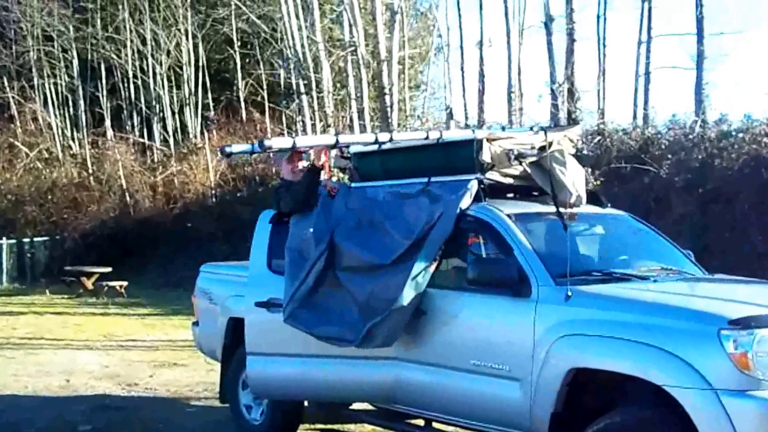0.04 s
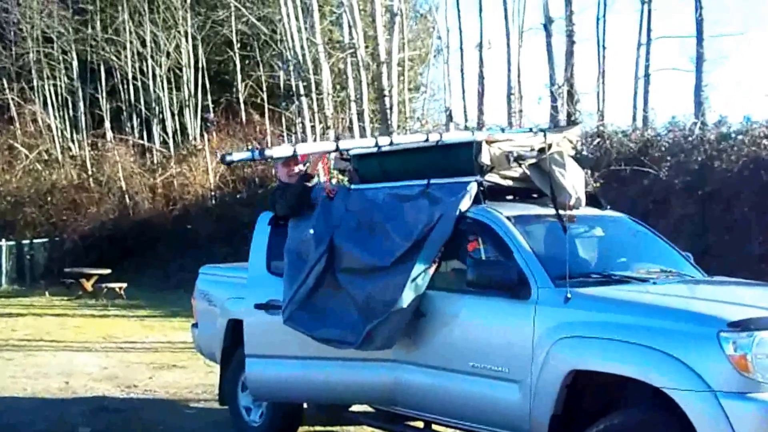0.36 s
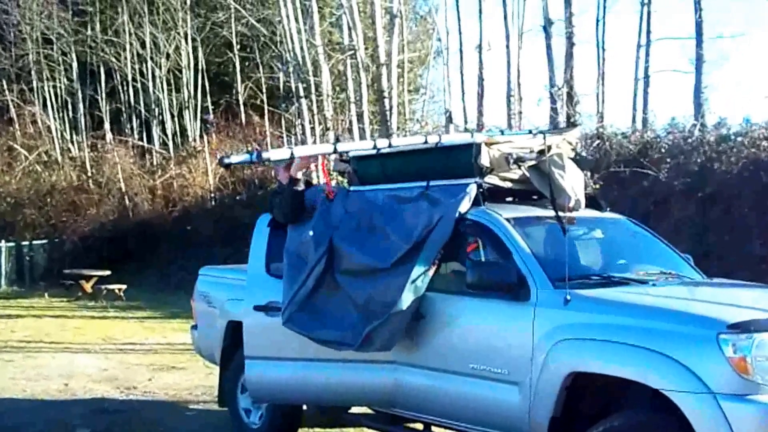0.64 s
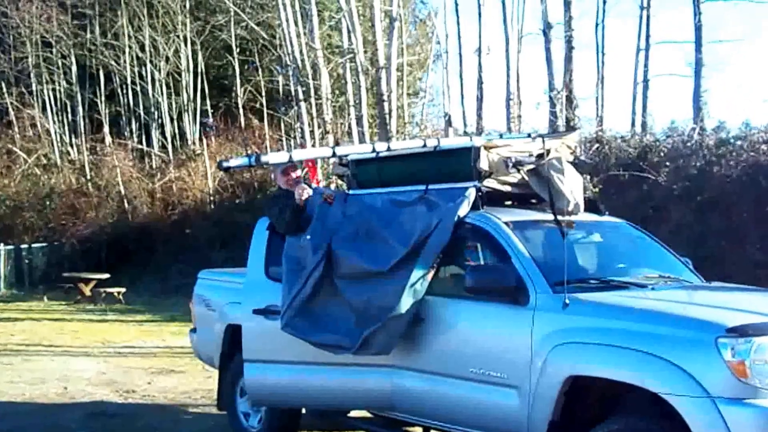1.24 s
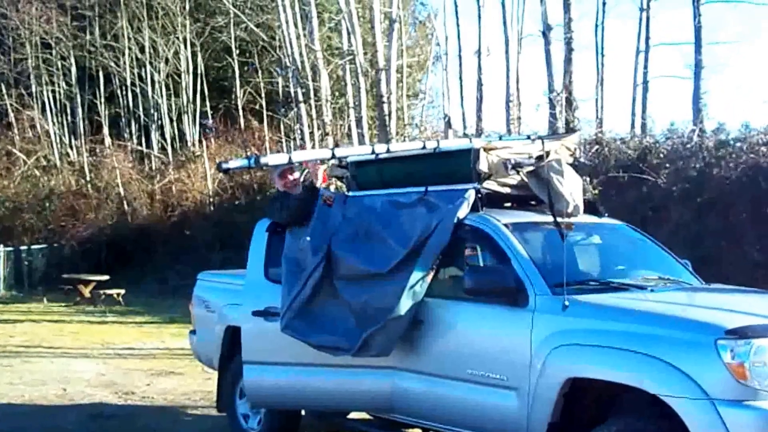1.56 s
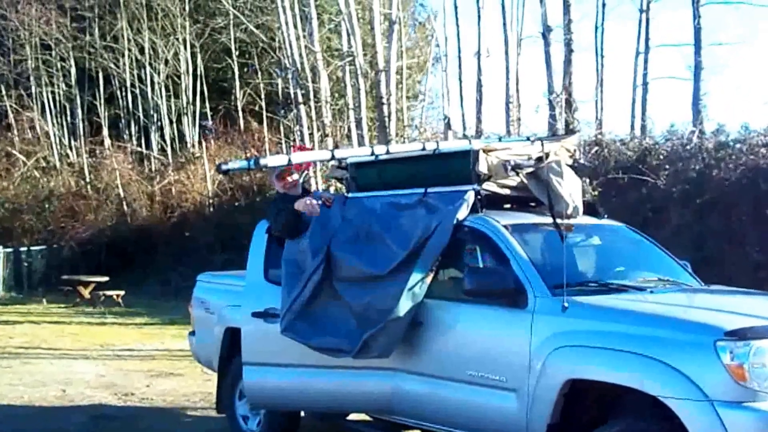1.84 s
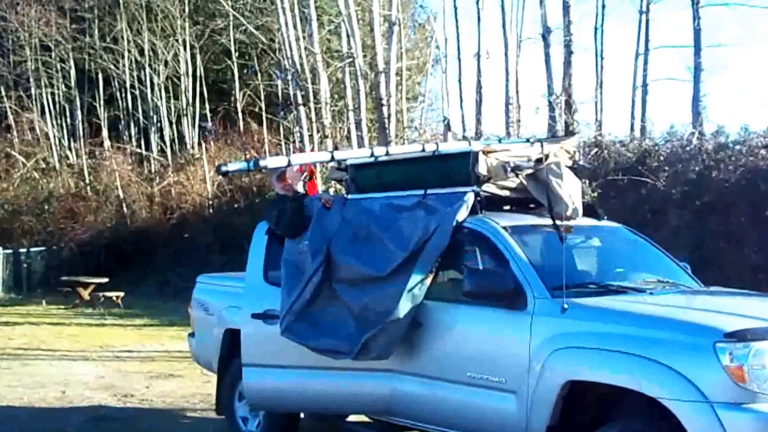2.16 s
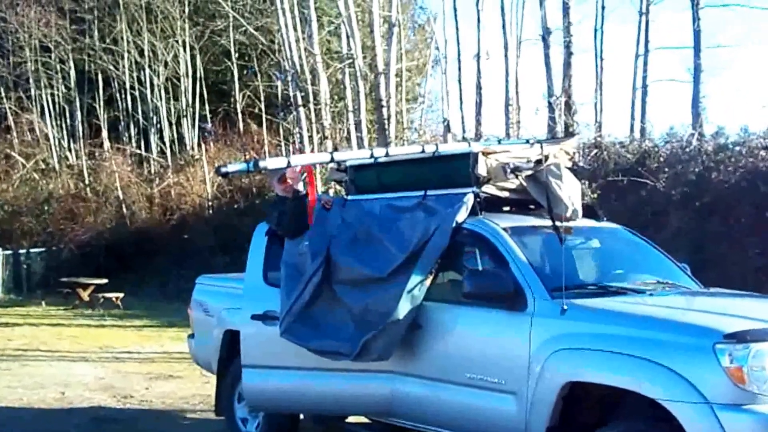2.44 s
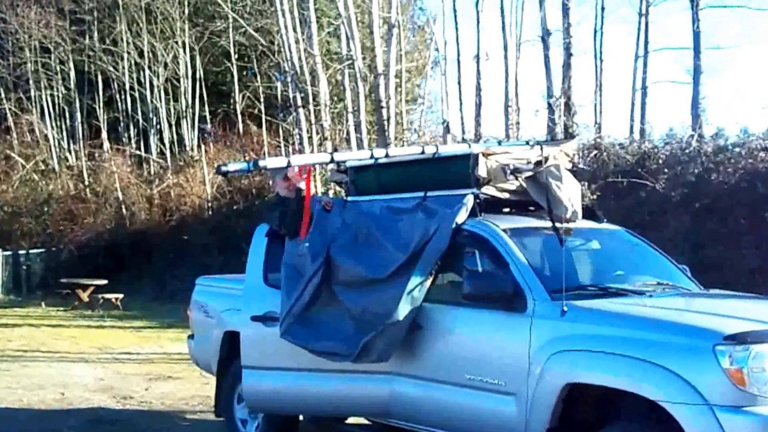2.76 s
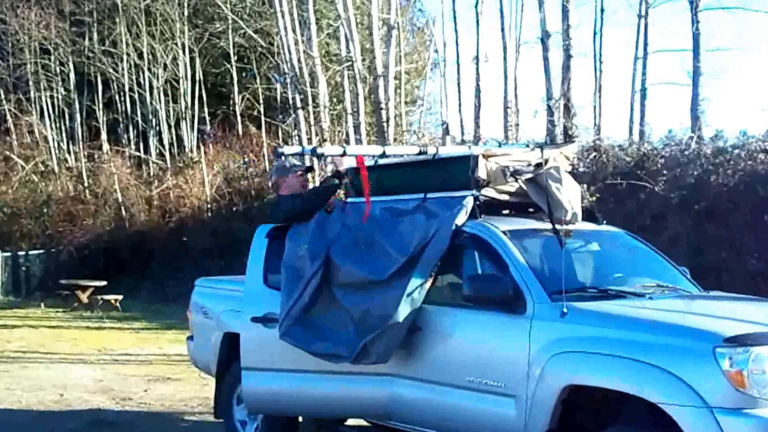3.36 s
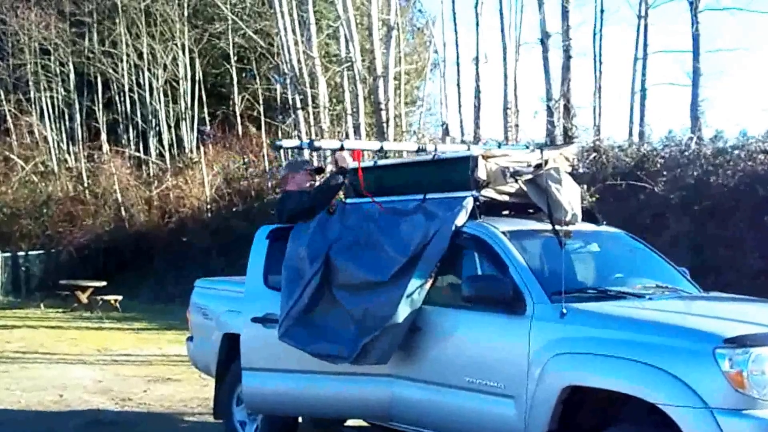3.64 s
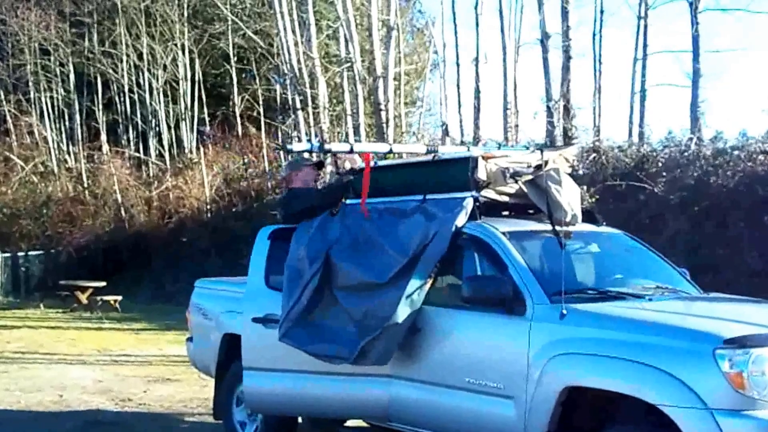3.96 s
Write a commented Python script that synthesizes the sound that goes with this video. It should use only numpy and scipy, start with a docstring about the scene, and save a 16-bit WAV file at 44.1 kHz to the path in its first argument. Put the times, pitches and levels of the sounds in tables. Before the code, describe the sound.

Gusty wind rumbles and thumps on the microphone, with faint rustling and a few buckle snaps.

```python
"""A clearing among trees, with a small microphone out in gusty wind. The gusts buffet it with a rumble
and a flutter, and single eddies thump on its port; a thin recording hiss swells and fades with the rumble.
Some metres off, a strap is worked on a roof tent: the fabric rustles and, near the end, the buckle snaps,
mostly in pairs, once ringing a pole. The clearing answers the tent faintly over a steady hush of trees."""
import sys
import numpy as np
from scipy import signal
from scipy.fft import rfft, irfft, next_fast_len
from scipy.io import wavfile
from scipy.ndimage import uniform_filter1d, map_coordinates

SR = 44100
rng = np.random.default_rng(int(sys.argv[2]) if len(sys.argv) > 2 else 0)


def persist_wave(psi):
    """Save psi, clipped to +-1, as 16-bit WAV."""
    counts = np.round(np.clip(psi, -1, 1) * 32767).astype(np.int16)
    wavfile.write(sys.argv[1], SR, np.atleast_2d(counts).T)


N = 176400

# Fine turbulence at the port, in strong gusts and around eddies: freq_hz, relative_db
CHURN_SPECTRUM = [(150, -24), (300, 3.5), (420, 1), (620, -11.5), (900, -16.5), (1400, -35), (3000, -59)]


def amp(db):
    """Decibels to gain."""
    return 10 ** (np.asarray(db) / 20)


def curves(rows):
    """One value per sample for each column after the time."""
    times, *columns = np.transpose(rows)
    return [np.interp(np.arange(N) / SR, times, column) for column in columns]


def wobble(rate):
    """A smooth random curve, rate knots a second."""
    return map_coordinates(rng.standard_normal(4000), [np.arange(N) * rate / SR], mode="mirror")


def filtered(x, response):
    """x through a complex response of frequency."""
    size = next_fast_len(N + SR // 2)
    return irfft(rfft(x, size) * response(np.fft.rfftfreq(size, 1 / SR)), size)[:N]


def highpassed(x, knee_hz):
    """First-order high-pass: swings slower than the knee leak away."""
    return filtered(x, lambda hz: 1j * hz / (knee_hz + 1j * hz))


def noise(spectrum):
    """Noise of rms 1, coloured by rows of freq_hz, relative_db."""
    freq_hz, db = np.transpose(spectrum)
    white = rng.standard_normal(N)
    coloured = filtered(white, lambda hz: amp(np.interp(np.log(hz + 1), np.log(freq_hz + 1), db)))
    return coloured / np.sqrt(np.mean(coloured ** 2) + 1e-20)


def loudness(x, samples):
    """Running rms, smoothed twice."""
    return np.sqrt(np.abs(uniform_filter1d(uniform_filter1d(x * x, samples), samples)) + 1e-14)


def even(x, samples):
    """Noise with its slower swells taken out."""
    return x / loudness(x, samples)


def burst(start_s, rise_s, hold_s, t60_s):
    """An envelope: linear attack, then exponential release from hold_s after the start."""
    age = np.arange(N) / SR - start_s
    return np.clip(age / rise_s, 0, 1) * amp(-60 * np.clip((age - hold_s) / t60_s, 0, 3))


def wind():
    """Gusts right on the microphone: rumble, lumpy flutter, churn and eddies."""
    # Strength of the buffeting: time_s, rumble_db, flutter_db
    gusts = [(0.0, -19, -54), (0.1, -21.5, -28.5), (0.18, -13.5, -22), (0.21, -27, -37), (0.29, -12.5, -14),
             (0.33, -28.5, -33.5), (0.37, -13, -13), (0.44, -21, -40), (0.56, -13, -7),
             (0.62, -20.5, -21.5), (0.76, -21.5, -32.5), (0.8, -16.5, -21), (0.91, -15.5, -26),
             (0.95, -20.5, -15), (0.97, -19, -29.5), (1.0, -22, -25.5), (1.1, -12, -10),
             (1.12, -16.5, -17.5), (1.32, -18, -16), (1.37, -10, -22), (1.39, -14, -11.5),
             (1.57, -15.5, -31), (1.6, -25, -38), (1.64, -16, -42), (1.66, -20, -22.5), (1.71, -30.5, -53),
             (1.77, -31.5, -61), (1.85, -15, -22), (1.89, -21.5, -29.5), (1.99, -17.5, -30.5),
             (2.02, -28, -35.5), (2.09, -13, -21.5), (2.13, -30, -41), (2.18, -14, -22.5), (2.24, -18, -25),
             (2.29, -30, -42.5), (2.36, -34, -42), (2.43, -23.5, -43), (2.47, -19.5, -24),
             (2.56, -22, -35.5), (2.6, -12.5, -18.5), (2.63, -30.5, -54), (2.65, -9, -22.5),
             (2.71, -28, -30), (2.75, -19.5, -23), (2.86, -19.5, -40), (2.92, -35, -46.5), (2.96, -25, -33),
             (2.99, -26.5, -58), (3.03, -19, -23.5), (3.09, -11.5, -17), (3.26, -26, -31.5),
             (3.32, -31, -43.5), (3.52, -25, -58), (3.63, -32.5, -38.5), (3.68, -29.5, -39.5),
             (3.71, -29, -52), (3.87, -40, -45), (3.91, -18, -37), (4.0, -44.5, -46)]
    # Slow pressure swings: freq_hz, relative_db
    rumble_spectrum = [(8.8, -36.5), (15, -1), (37, 2.5), (75, 3), (209, -18.5), (300, -28.5), (390, -63.5),
                       (660, -120)]
    # Faster flutter on the port: freq_hz, relative_db
    flutter_spectrum = [(60, -19.5), (110, -3), (160, 11), (240, 1), (340, -7.5), (500, -22.5), (800, -37),
                        (1500, -50), (3000, -87.5)]
    rumble_db, flutter_db = curves(gusts)
    thumps, nearness = eddies()
    rumble = amp(rumble_db + 1.2 * wobble(30)) * even(noise(rumble_spectrum), samples=1500)
    lumps = noise(flutter_spectrum) * amp(5.4 * wobble(90))
    capped_db = np.minimum(flutter_db, -16.5)  # stronger gusts arrive as eddies
    flutter = amp(capped_db - 3 + 3.0 * wobble(35)) * even(lumps, samples=900)
    strong_gust_db = -16  # the churn grows with the flutter up to here
    churn_db = -30.5 + 1.8 * np.minimum(flutter_db - strong_gust_db, 0)
    churn = amp(churn_db) * even(noise(CHURN_SPECTRUM) * amp(6.5 * wobble(120)), samples=1200)
    displaced = 0.58 * nearness  # share that a passing eddy pushes aside
    return rumble + (1 - displaced) * (flutter + churn) + thumps


def recording_hiss(buffeting):
    """A thin recording hiss that swells and fades with the rumble, following its faster swings."""
    hiss_spectrum = [(300, -4.5), (800, -1), (2000, 1.5), (4500, 0), (7500, 0.5)]
    swing = loudness(highpassed(buffeting, knee_hz=109), samples=120)
    return amp(-28.5) * swing * noise(hiss_spectrum)


def trees():
    """The trees all round: a steady hush that wavers a little."""
    # Wind in the trees: freq_hz, relative_db
    hush_spectrum = [(30, 9.5), (150, -2.5), (350, 2.5), (800, 5), (1300, -3), (2000, -15.5), (4000, -37.5),
                     (8000, -15.5)]
    return amp(-50.5 + 1.1 * wobble(3.4)) * noise(hush_spectrum)


def fabric():
    """Tent fabric, some metres off: grainy strokes, each with a duller flap, over a faint shifting."""
    # Strokes of fabric and webbing: start_s, relative_db, flap_re_rustle_db
    strokes = [(0.04, -34, -4.5), (0.076, -34, -1), (0.3134, -44, -7), (0.334, -36.5, -10),
               (0.4538, -25, 3), (0.5365, -31.5, 3), (0.748, -29.5, -12), (0.763, -41, -14),
               (1.0335, -33.5, -22), (2.814, -33.5, 2.5), (2.8842, -25.5, -6.5), (2.8994, -42, -10),
               (3.3614, -38.5, -8), (3.4909, -41, -1), (3.5049, -31, -6.5), (3.5338, -36, -4),
               (3.827, -45, 4)]
    # The fabric shifting throughout: time_s, level_db
    shifting_levels = [(0, -60), (.7, -61), (.9, -57), (1.7, -57), (2.35, -63), (2.8, -58.5), (3.0, -53),
                       (3.38, -52), (3.65, -56), (3.85, -56.5), (4, -53)]
    # Rustle of the fabric: freq_hz, relative_db
    rustle_spectrum = [(300, -12.5), (900, -2.5), (1500, -2.5), (2800, -1.5), (4500, -2), (7500, -12)]
    # Flap of taut canvas: freq_hz, relative_db
    flap_spectrum = [(300, -21), (700, -3.5), (1200, -0.5), (2200, -7.5), (4000, -21)]
    rustles, flaps = np.zeros((2, N))
    for start_s, db, flap_db in strokes:
        stroke = amp(db - 11) * burst(start_s, rise_s=0.0042, hold_s=0.0069, t60_s=0.044)
        rustles += stroke
        flaps += amp(flap_db) * stroke
    shifting_db, = curves(shifting_levels)
    grain = even(noise(rustle_spectrum) * amp(3.5 * wobble(600)), samples=700)
    shifting = amp(shifting_db + wobble(30))
    return (rustles + shifting) * grain + flaps * noise(flap_spectrum)


def clearing(x):
    """A diffuse answer from the trees round the clearing."""
    tail = noise([(200, -5), (1000, 0.5), (3000, -2.5), (8000, 4)])
    tail *= burst(0, rise_s=0.008, hold_s=0, t60_s=0.48)
    return signal.fftconvolve(x, tail / np.linalg.norm(tail))[:N]


def eddies():
    """Each eddy is a rounded push of pressure in a wake of churn; also gives how near one is, 0-1."""
    # Eddies that hit the port: centre_s, relative_db, half_width_ms
    hits = [(.163, -3.5, 1.32), (.190, -9, 1.5), (.256, -8.5, 1.24), (.288, -4.5, .7), (.370, 0, 0.73),
            (.400, -11, 1.1), (.412, -11.5, 0.93), (.541, -10, 0.47), (0.548, -3.5, 0.52),
            (0.569, -4.5, 0.37), (.577, -17.5, 0.43), (.610, -13, 0.74), (.815, -5, 2.1), (.944, 0, 1.26),
            (1.049, -2, 0.6), (1.077, -7.5, 0.64), (1.091, -1.5, 0.45), (1.093, -6, 0.59),
            (1.149, -12, 0.47), (1.178, -5.5, 0.52), (1.237, -4.5, 0.75), (1.279, -13.5, 0.79),
            (1.311, -5, 0.59), (1.348, -3, 1.17), (1.396, -1, 1.05), (1.405, -6, 0.39), (1.442, -8.5, 0.75),
            (1.478, -16.5, 0.56), (1.66, -16.5, 0.63), (2.175, -10, 0.78), (2.594, -5, 1.9),
            (2.759, -4, 1.14), (3.054, -8, 0.77), (3.093, -4, 1.45), (3.107, -4.5, 1.4),
            (3.116, -2.5, 0.64), (3.13, -13, 0.52), (3.154, -9.5, .8), (3.16, -13.5, 0.71), (3.174, -5, 1),
            (3.188, -13.5, 2), (3.209, -6.5, 2), (3.234, -5.5, 0.82), (3.257, -6.5, 0.87)]
    wake_s, passing_s = 0.0029, 0.016
    t = np.arange(N) / SR
    push, wake, nearness = np.zeros((3, N))
    for centre_s, db, half_width_ms in hits:
        span = np.abs(t - centre_s) < 0.05
        age = t[span] - centre_s
        push[span] += amp(db + 2) * np.exp(-(age * 1000 / half_width_ms) ** 2 / 2)
        wake[span] += amp(db - 21) * np.exp(-np.abs(age) / wake_s) / half_width_ms
        nearness[span] += np.exp(-(age / passing_s) ** 2)
    thumps = highpassed(push, knee_hz=57) + wake * even(noise(CHURN_SPECTRUM), samples=500)
    return thumps, np.minimum(nearness, 1)


def buckle():
    """Each snap is a dry clatter with a duller body; one rings the pole; all bounce off the ground."""
    # Snaps of the strap's buckle: start_s, relative_db, body_trim_db
    snaps = [(2.944, -22.5, -18), (3.0219, -8.5, -27), (3.0394, -7.5, -15.5), (3.2790, -1, -22),
             (3.2931, -6.5, -19), (3.8779, -10.5, -27.5), (3.9008, -9.5, -19), (3.9247, -29, -16)]
    # Bright clatter of a snap: freq_hz, relative_db
    clatter_spectrum = [(500, -45.5), (1800, -26.5), (2600, -4), (3500, 2.5), (5000, 3), (6200, -1.5),
                        (7400, 3.5), (8200, -22)]
    # Dull body of a snap: freq_hz, relative_db
    body_spectrum = [(100, -22.5), (400, 2.5), (800, 7), (1200, 4.5), (1700, 3.5), (2500, 0.5),
                     (4000, -36.5)]
    # Modes of the tent pole: pitch_hz, relative_db, t60_s
    pole_modes = [(2735, 0, .2), (3640, -12, .18), (5895, -22, .15)]
    rise_s, hold_s = 0.00097, 0.0049
    pole_hit_s = 3.04
    ground_delay_s, ground_gain = 0.00082, 0.25
    t = np.arange(N) / SR
    clatter, body, ring = np.zeros((3, N))
    for start_s, db, body_trim_db in snaps:
        clatter += amp(db) * burst(start_s, rise_s, hold_s, t60_s=0.026)
        body += amp(db + body_trim_db + 10.5) * burst(start_s, rise_s, hold_s, t60_s=0.038)
    clatter *= even(noise(clatter_spectrum) * amp(3.7 * wobble(900)), samples=220)
    body *= even(noise(body_spectrum), samples=300)
    for pitch_hz, db, t60_s in pole_modes:
        ring += amp(db - 27) * burst(pole_hit_s, rise_s, 0, t60_s) * np.sin(2 * np.pi * pitch_hz * t)
    direct = amp(-9.5) * (clatter + body + ring)
    return filtered(direct, lambda hz: 1 + ground_gain * np.exp(-2j * np.pi * hz * ground_delay_s))


def scene():
    tent = buckle() + fabric()
    surroundings = tent + amp(-26.5) * clearing(tent) + trees()
    buffeting = wind()
    return (surroundings + buffeting + recording_hiss(buffeting))[None]


def record(dry):
    """The recorder rounds off the highest peaks and keeps nothing above its band limit."""
    ceiling, top_hz = 0.92, 7950
    rounded = dry[0] / (1 + np.abs(dry[0] / ceiling) ** 6) ** (1 / 6)
    return filtered(rounded, lambda hz: 1 / np.sqrt(1 + (hz / top_hz) ** 200))[None]


dry = scene()
out = record(dry)
persist_wave(out)
```